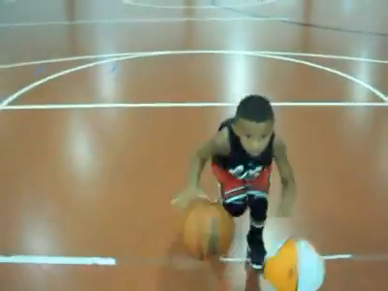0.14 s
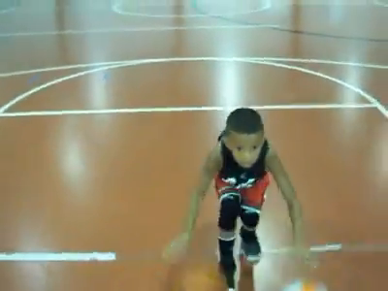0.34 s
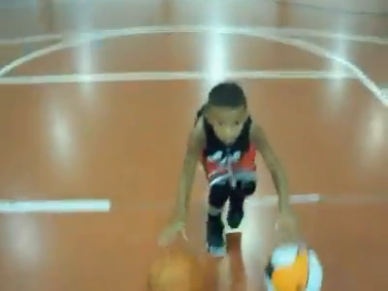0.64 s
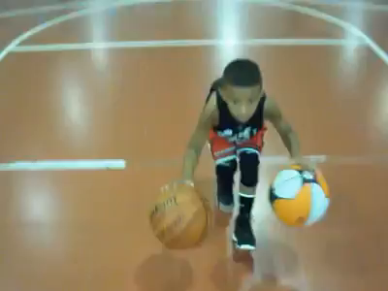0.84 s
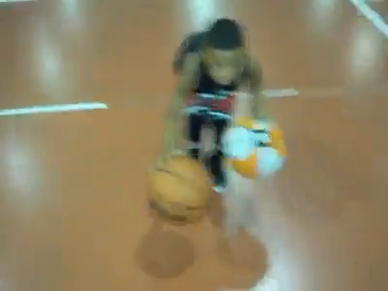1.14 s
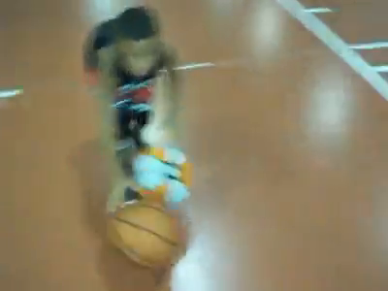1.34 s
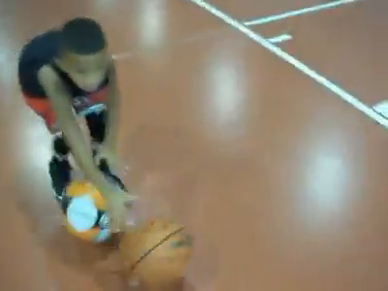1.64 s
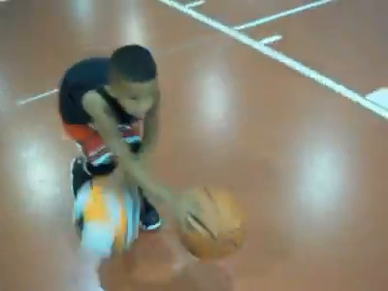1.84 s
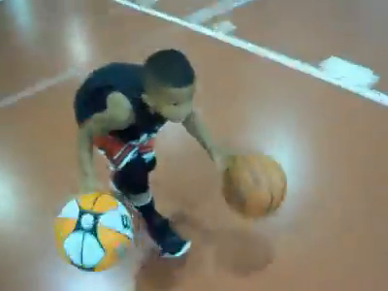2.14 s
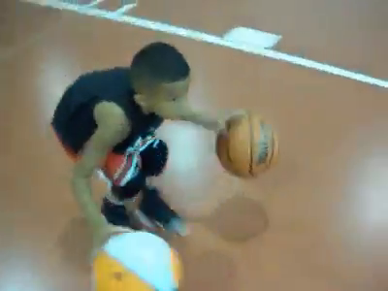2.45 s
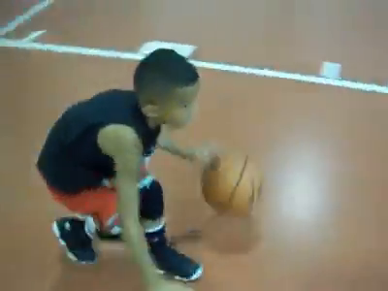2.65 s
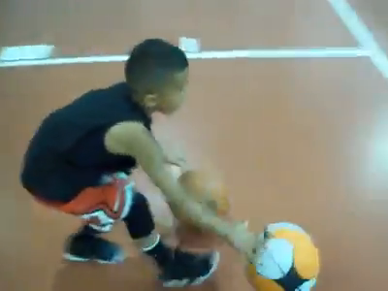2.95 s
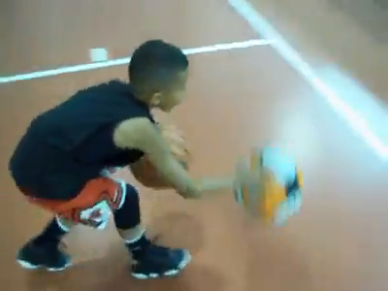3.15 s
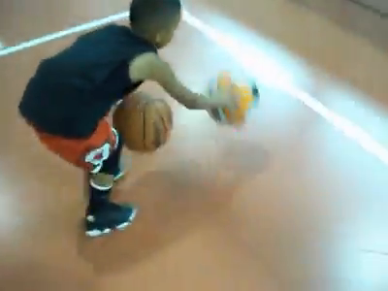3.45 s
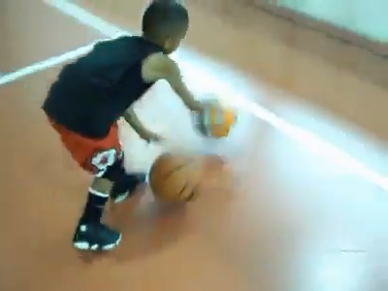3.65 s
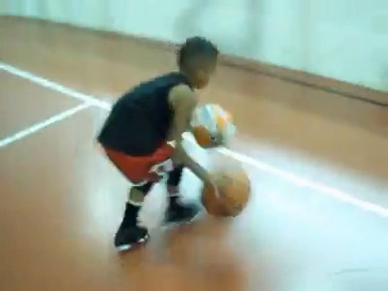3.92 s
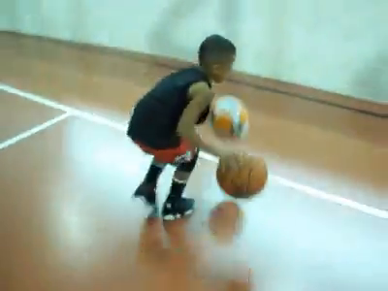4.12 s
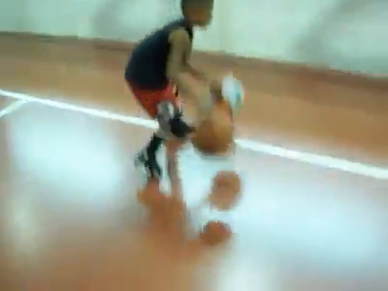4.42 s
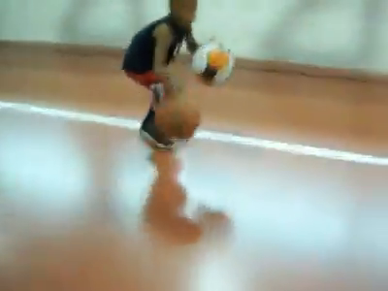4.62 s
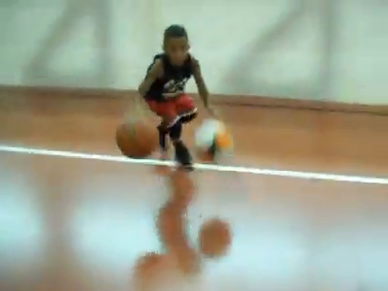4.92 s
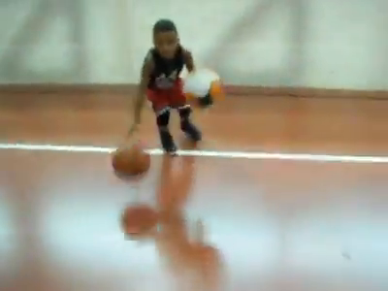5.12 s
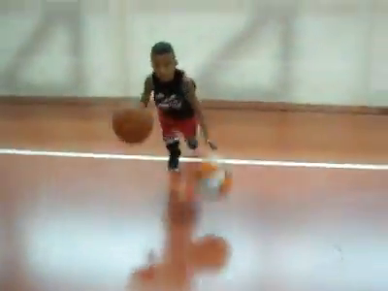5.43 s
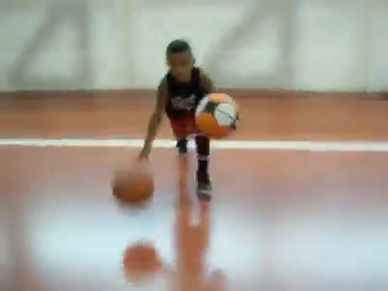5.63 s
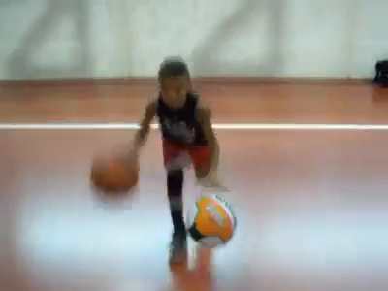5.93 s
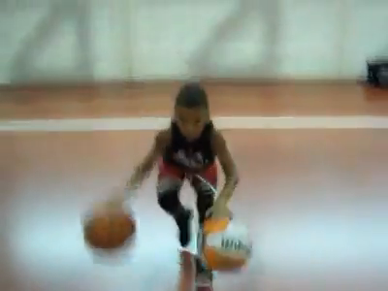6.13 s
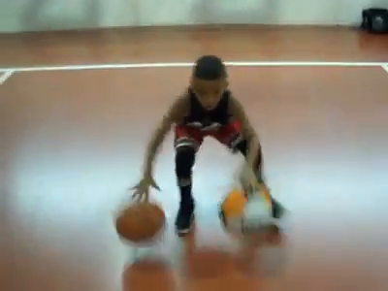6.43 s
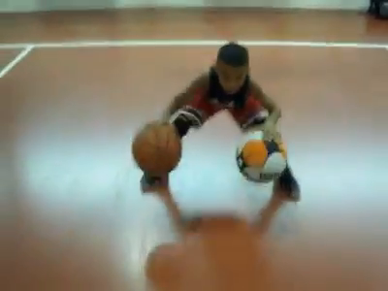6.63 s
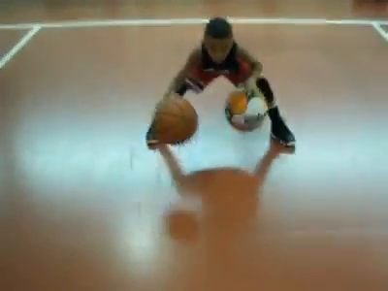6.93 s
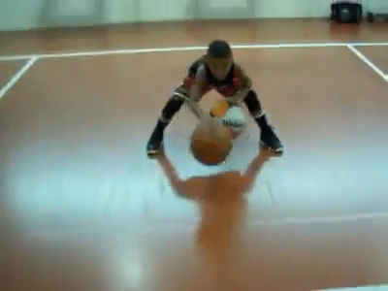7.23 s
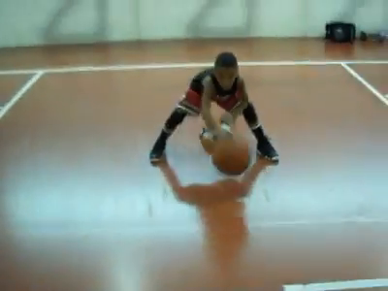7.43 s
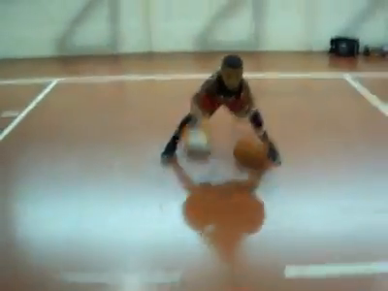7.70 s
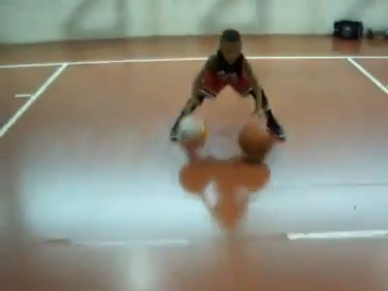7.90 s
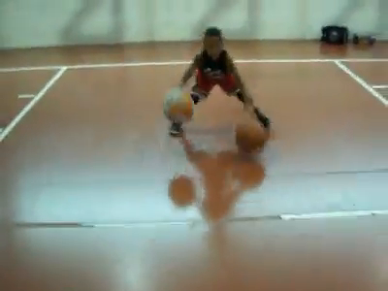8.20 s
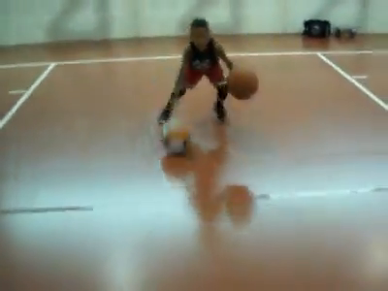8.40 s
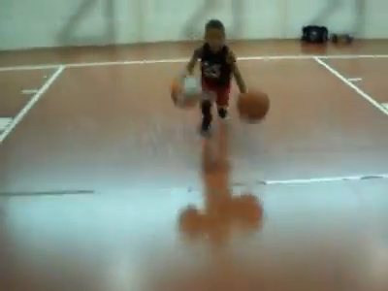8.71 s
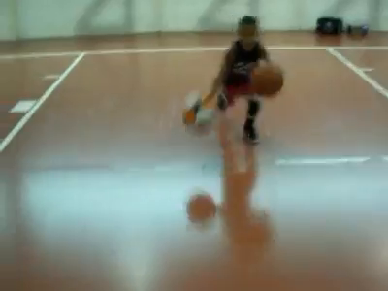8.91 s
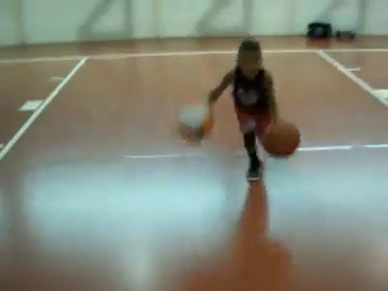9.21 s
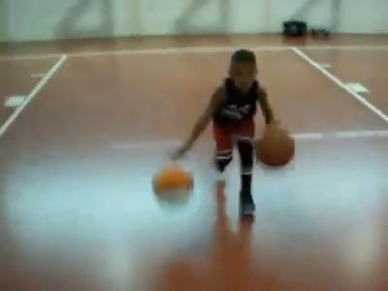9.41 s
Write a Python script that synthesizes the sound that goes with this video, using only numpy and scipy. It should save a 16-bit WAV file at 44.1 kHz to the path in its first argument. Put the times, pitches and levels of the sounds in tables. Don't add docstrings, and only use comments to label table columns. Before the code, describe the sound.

Two balls hit a sprung wooden gym floor about three times a second, nearly in unison, each a low thump with a slappy, ringing edge. Midway the hits separate, alternate and grow louder, soften for a low crossing, then end very loud. Soft steps, hand taps, faint shoe squeaks, far ball booms and ventilation rumble lie behind. A small, dull microphone overloads and ducks after impacts.

```python
import sys
import numpy as np
from scipy import signal
from scipy.io import wavfile

SR = 44100
rng = np.random.default_rng(int(sys.argv[2]) if len(sys.argv) > 2 else 0)


def file_out(sig):
    cols = np.atleast_2d(sig).T
    lim = np.clip(cols, -1, 1)
    pcm = np.round(lim * 32767).astype(np.int16)
    wavfile.write(sys.argv[1], SR, pcm)


def invert_db(level):
    return 10 ** (np.asarray(level, dtype=float) / 20)


N = 421596


def rms_one(x):
    return x / np.sqrt(np.mean(x ** 2) + 1e-20)


def in_time(rows):
    return np.interp(np.arange(N) / SR, *np.transpose(rows))


def bandpass(x, low_hz, high_hz):
    return signal.sosfilt(signal.butter(2, [low_hz, high_hz], "band", fs=SR, output="sos"), x)


def band(noise, low_hz, high_hz):
    return rms_one(bandpass(noise, low_hz, high_hz))


def decay(t, t60_s):
    return invert_db(-60 * t / t60_s)


def ring(t, hz, t60_s):
    return np.sin(2 * np.pi * hz * t) * decay(t, t60_s)


def drift(rate):
    step = 40
    settle = 2000
    r = np.exp(-2 * step * np.pi * rate / SR)
    white = rng.standard_normal(N // step + settle + 2)
    slow = signal.lfilter([1], [1, -2 * r, r * r], white)[settle:]
    return np.interp(np.arange(N) / step, np.arange(len(slow)), rms_one(slow))


def banded_noise(spectrum, patchy_db, rate):
    hz_points, db_points = np.transpose(spectrum)
    octaves = np.log2(hz_points[-1] / hz_points[0])
    edges_hz = np.geomspace(hz_points[0], hz_points[-1], int(3 * octaves) + 2)
    white = rng.standard_normal((2, N + SR))
    together = drift(rate)
    out = 0
    for k, (low_hz, high_hz) in enumerate(zip(edges_hz, edges_hz[1:])):
        noise = bandpass(white[k % 2], low_hz, high_hz)[SR:]
        level_db = np.interp(np.log(low_hz * high_hz) / 2, np.log(hz_points), db_points)
        flicker_db = patchy_db * (0.4 * together + drift(rate))
        out = out + invert_db(level_db + flicker_db) * noise
    return rms_one(out)


# frequency in Hz, density in dB per Hz.
RUMBLE_SPECTRUM = [(7.1, -51.5), (12, 5), (54, 1.5), (110, -10), (140, -21.5), (240, -120)]
# time in seconds, rumble level in dB.
AIRFLOW = [(0.0, -26), (0.48, -35.5), (0.8, -28.5), (3.06, -31), (3.17, -29.5), (3.91, -34), (4.55, -28),
           (5.86, -35), (7.88, -30.5), (8.2, -23), (8.65, -30), (9.56, -27)]


def ventilation():
    return invert_db(in_time(AIRFLOW) + 1.5) * banded_noise(RUMBLE_SPECTRUM, patchy_db=1.5, rate=3.3)


# start in seconds, boom level in dB, wash level in dB.
FAR_BALLS = [
    (.13, -30, -39),
    (1.47, -21, -34),
    (2.5, -26, -37),
    (3.5, -28, -44.5),
    (5.24, -21, -32),
    (5.9, -31.5, -47),
    (6.8, -30, -45),
    (8.2, -35, -36),
]


def far_swells():
    out = np.zeros((2, N))
    for start_s, boom_db, wash_db in FAR_BALLS:
        t = np.maximum(np.arange(N) / SR - start_s, 0)
        rise = 1 - np.exp(-t / 0.042)
        out += invert_db([[boom_db], [wash_db]]) * rise * decay(t, 1.3)
    return out


# frequency in Hz, density in dB per Hz.
BOOM_SPECTRUM = [(35, -18.5), (60, 2.5), (89, -1), (210, -8.5), (291, -25.5), (357, -24), (430, -36.5),
                 (500, -23), (650, -53.5), (1100, -120)]
# frequency in Hz, density in dB per Hz.
WASH_SPECTRUM = [(180, -15.5), (300, -4.5), (429, 4.5), (520, -11.5), (698, -3.5), (1030, -1.5),
                 (1590, -2.5), (1800, 0.5), (2680, -14), (3790, -10), (4710, -22), (5780, -10.5),
                 (6400, -51.5), (8320, -71.5), (14100, -120)]
# time in seconds, wash level in dB.
BUSTLE = [(0.0, -45.5), (1.41, -45.5), (1.57, -40), (2.39, -45), (2.55, -39), (3.35, -45.5), (3.83, -41.5),
          (4.85, -45.5), (5.27, -41), (6.44, -40.5), (7.24, -43), (9.56, -38.5)]


def bustle():
    wash_db = in_time(BUSTLE)
    boom_db = -32.5 + 0.44 * (wash_db - wash_db.mean())
    far_boom, far_wash = far_swells()
    boom = np.hypot(invert_db(boom_db + 2.0), far_boom) * banded_noise(BOOM_SPECTRUM, patchy_db=2.5, rate=16.0)
    wash = np.hypot(invert_db(wash_db + 1.0), far_wash) * banded_noise(WASH_SPECTRUM, patchy_db=1.8, rate=6.0)
    return boom + wash


# start in seconds, end in seconds, centre in Hz, width in Hz, level in dB.
SQUEAKS = [
    (.15, .43, 1880, 150, -44.5),
    (5.32, 5.46, 1940, 200, -45),
    (5.5, 5.68, 2000, 200, -47),
    (6.19, 6.285, 2055, 80, -43),
]


def squeaks():
    t = np.arange(N) / SR
    noise = rng.standard_normal(N)
    out = 0
    for start_s, end_s, hz, width_hz, db in SQUEAKS:
        swell = np.clip(np.minimum(t - start_s, end_s - t) / 0.012, 0, 1)
        out = out + invert_db(db) * swell * band(noise, hz - width_hz / 2, hz + width_hz / 2)
    return out


def hall_tail(x, t60_s, onset_s):
    t = np.arange(2 * SR) / SR
    buildup = 1 - np.exp(-(t / onset_s) ** 2)
    response = rng.standard_normal(len(t)) * decay(t, t60_s) * buildup
    return signal.fftconvolve(x, response / np.sqrt(np.sum(response ** 2)))[:N]


# start in seconds, frequency in Hz, level in dB, t60 in
# seconds.
THUDS = [(0.292, 385, -13, 0.04), (1.402, 205, -16.5, 0.12), (2.235, 366, -33, 0.12),
         (2.426, 249, -24, 0.16), (3.794, 182, -3.5, 0.054), (5.707, 188, -7, 0.029),
         (6.375, 412, -19, 0.057), (6.374, 199, -10.5, 0.034), (6.46, 252, -21.5, 0.043),
         (6.741, 272, -13.5, 0.027), (6.87, 189, -20.5, 0.094), (7.313, 250, -18, 0.049)]


def floor_thuds():
    size = SR // 10
    t = np.arange(size) / SR
    out = np.zeros(N + 2 * size)
    for start_s, hz, db, t60_s in THUDS:
        at = round(start_s * SR)
        out[at:at + size] += invert_db(db) * ring(t, hz, t60_s) * (1 - np.exp(-t / 0.0003))
    return out[:N]


# frequency in Hz, level against the stronger of push and shell in dB, t60 in
# seconds.
BALL_MODES = [(425.8, -11.5, 0.082), (320.8, -18.5, 0.019), (457.4, -26.5, 0.097), (996, -22, 0.12),
              (1290, -21, 0.07)]


def bounce(slap_db, slap_hz, push_db, shell_db, tick_db, rough, spot_db, chance, noise):
    t = np.arange(len(noise)) / SR
    contact_s, push_hz, shell_hz = 0.011, 96, 197
    on_floor = np.sin(np.pi / 2 * np.clip(t / 0.0009, 0, 1)) ** 2 / (1 + (t / contact_s) ** 6)
    push = on_floor * np.cos(2 * np.pi * push_hz * t + 0.27)
    shell = (on_floor + 0.04) * ring(t, shell_hz, 0.2)

    modes = 0
    for (hz, db, t60_s), c in zip(BALL_MODES, chance):
        modes = modes + invert_db(db + 0.53 * np.tanh(c)) * ring(t, hz * (1 + 0.025 * c), t60_s)
    modes = modes * (1 - np.exp(-t / 0.0089))
    boards = invert_db(-8.5) * band(noise[::-1], 220, 340) * (1 - np.exp(-t / 0.012)) * decay(t, 0.066)

    rise = np.clip(t / (0.0001 + 0.002 * rough ** 2), 0, 1)
    smack = rise * np.exp(-(t / (0.002 + 0.003 * rough)) ** 2)
    tone = np.sin(2 * np.pi * slap_hz * t)
    rasp = band(noise, 0.67 * slap_hz, 1.28 * slap_hz)
    slap = smack * ((1 - rough) * tone + 1.07 * rough * rasp)
    slap = slap + 0.17 * band(noise, 750, 1800) * (1 - np.exp(-t / 0.001)) * decay(t, 0.075)
    tick = band(noise[::-1], 1500, 4810) * (smack + 0.059 * decay(t, 0.35))

    low = invert_db(push_db) * push + invert_db(shell_db) * shell
    low = low + invert_db(max(push_db, shell_db) + spot_db) * (modes + boards)
    return invert_db(2.0) * low + invert_db(slap_db + 1.5) * slap + invert_db(tick_db - 0.5) * tick


# start in seconds, slap level in dB, slap frequency in Hz, push level in dB, shell level in dB.
PAIRED = [(0.0574, -11.5, 1430, -10, -13), (0.1121, -12, 1890, -11.5, -20),
          (0.4277, -10.5, 1380, -17, -13.5), (0.4375, -15, 1930, -13.5, -12),
          (0.7277, -8.5, 1450, -16.5, -9), (0.7549, -15, 1650, -8, -11.5),
          (1.0631, -16, 1790, -18.5, -11.5), (1.0819, -9.5, 1700, -17.5, -14),
          (1.3975, -12, 1890, -28, -10), (1.4015, -16.5, 1710, -41, -20.5),
          (1.7144, -10.5, 1900, -12.5, -13), (1.7264, -13.5, 1281, -14.5, -27),
          (2.022, -12.5, 2100, -11, -16.5), (2.051, -20, 2030, -19, -39),
          (2.3629, -11.5, 1290, -10.5, -11.5), (2.3901, -10, 2220, -17, -10),
          (2.6972, -14.5, 1260, -13.5, -32), (2.7369, -9.5, 1080, -9.5, -14),
          (3.052, -12.5, 1280, -10, -15), (3.1008, -8, 2200, -6, -31.5), (3.4034, -13.5, 1410, -42, -15),
          (3.4556, -10.5, 1340, -11, -16.5), (3.7402, -11, 1440, -13, -19), (3.7905, -11.5, 920, -8, -29.5)]
# start in seconds, slap level in dB, slap frequency in Hz, push level in dB, shell level in dB.
ALTERNATE = [(4.088, -14, 1116, -10, -33), (4.0951, -13.5, 1210, -37, -30), (4.106, -15, 1027, -12, -42),
             (4.112, -7, 840, -9.5, -12.5), (4.4312, -11.5, 895, -12, -34), (4.4426, -26.5, 966, -16, -31),
             (4.8307, -8.5, 1230, -13, -13.5), (4.9454, -5.5, 1440, -8, -10.5),
             (5.193, -8.5, 1310, -6, -12), (5.481, -5, 1630, -4.5, -5), (5.6895, -7.5, 1460, -7, -8),
             (5.9622, -7, 1660, -3.5, -10), (6.1427, -4.5, 1090, -4.5, -10), (6.3025, -4.5, 1880, -6, -3),
             (6.557, -14, 1760, -10, -10), (6.588, -6.5, 1490, -8.5, -12), (6.8568, -8.5, 1280, -12, -15.5),
             (7.1442, -17.5, 1350, -16.5, -29), (7.1602, -11.5, 1460, -23, -11.5),
            (7.4463, -8.5, 950, -11, -17), (7.7288, -15, 940, -13.5, -13),
            (7.9781, -12.5, 1800, -15.5, -11.5), (7.9994, -16.5, 1380, -24, -11.5),
            (8.2027, -13, 1310, -17.5, -10.5), (8.2967, -7.5, 1076, -11, -11), (8.5152, -2, 1280, -4.5, -6),
            (8.696, -5.5, 1120, -9.5, -10), (8.9374, -4, 1734, -6.5, -3), (9.1945, -6.5, 1160, -3.5, -6.5),
            (9.4548, 0, 1173, -4.5, -1.5)]
# delay in seconds, slap against the bounce in dB, slap
# frequency in Hz, tick against that slap in dB.
AFTERSLAP = [
    (0.0108, -16, 1130, -20),
]
# start in seconds, slap level in dB, slap frequency in Hz, tick level in dB.
TAPS = [(1.462, -19.5, 1290, -34), (1.471, -29.5, 1290, -37.5), (1.488, -24, 1300, -30),
        (1.566, -23, 1330, -35), (2.2358, -26.5, 807, -35.5), (2.5265, -19, 1580, -46.5),
        (2.5773, -24, 1300, -37), (2.423, -27.5, 1200, -39), (3.074, -29, 1660, -46),
        (4.126, -24, 1055, -43), (4.4496, -17.5, 1120, -21), (5.2342, -24, 1570, -41),
        (4.729, -40, 1520, -42), (5.8848, -44, 1800, -34), (6.009, -27.5, 1210, -33),
        (6.374, -22.5, 1580, -22.5), (6.463, -28.5, 1344, -34.5), (6.7395, -24.5, 1040, -27.5),
        (7.315, -24, 1500, -52.5), (7.7406, -23, 1120, -31.5), (7.8953, -22, 1150, -44),
        (8.085, -33.5, 1500, -38.5), (8.1886, -27, 1910, -31), (8.9485, -10.5, 980, -44),
        (8.99, -23, 1540, -33), (9.5073, -20, 1650, -45)]


def contact_list():
    rough, no_weight_db = 0.7, -40
    hits = PAIRED + ALTERNATE
    tick_under_db = [-17, -13.5] * (len(PAIRED) // 2) + [-12.5] * (len(hits) - len(PAIRED))
    luck = np.tanh(rng.standard_normal((len(hits), 1 + len(AFTERSLAP), 3)))
    rows = []
    for hit, under_db, c in zip(hits, tick_under_db, luck):
        start_s, slap_db = hit[:2]
        rows.append((*hit, slap_db + under_db + 6.5 * c[0, 0], 0.2))
        for (delay_s, db, hz, tick_db), (late, loud, high) in zip(AFTERSLAP, c[1:]):
            after_s = start_s + delay_s + 0.001 * late
            after_db = slap_db + db + 3 * loud
            after_hz = hz + 120 * high
            rows.append((after_s, after_db, after_hz, no_weight_db, no_weight_db, after_db + tick_db, rough))
    for start_s, slap_db, slap_hz, tick_db in TAPS:
        rows.append((start_s, slap_db, slap_hz, no_weight_db, no_weight_db, tick_db, rough))
    return rows


# time in seconds, ringing level in dB.
SPOT = [(0, 3), (2.5, 10), (4.6, 2), (5.0, 2), (7.0, 2), (9.56, -4.5)]
# time in seconds, extra path in metres, echo level in dB.
WALL = [(0, 4.8, -12.5), (2.0, 3.76, -21.5), (2.7, 4.0, -13), (3.4, 3.39, -15), (4.4, 3.37, -11.5),
        (4.95, 3.27, -12), (5.7, 4.13, -13), (5.961, 5.4, -8), (6.3, 7.66, -13), (6.859, 8.2, -10.5),
        (8.3, 8.4, -14.5), (8.698, 10, -14.5), (9.2, 11, -16.5), (9.46, 14.3, -14.5)]


def dribbling():
    size, sound_m_per_s = SR // 10, 343
    contacts = contact_list()
    chance = rng.standard_normal((len(contacts), len(BALL_MODES)))
    noise = rng.standard_normal((len(contacts), size))
    wall_s, path_m, wall_db = np.transpose(WALL)
    out = np.zeros(N + 2 * size)
    for (start_s, *levels), c, n in zip(contacts, chance, noise):
        spot_db = np.interp(start_s, *np.transpose(SPOT))
        sound = bounce(*levels, spot_db, c, n)
        at = round((start_s - 0.0003) * SR)
        out[at:at + size] += sound
        at += round(np.interp(start_s, wall_s, path_m) / sound_m_per_s * SR)
        out[at:at + size] += invert_db(np.interp(start_s, wall_s, wall_db)) * sound
    return out[:N]


def scene():
    background = ventilation() + bustle() + squeaks()
    near = dribbling() + floor_thuds()
    slaps = bandpass(near, 650, 3000)
    hall = invert_db(-17.5) * hall_tail(slaps, t60_s=1.1, onset_s=0.043)
    return (background + near + hall)[None]


def gain_control(x, knee_db, slope, release_db_per_s, attack_s):
    fall_db = release_db_per_s * np.arange(N) / SR
    held_db = np.maximum.accumulate(20 * np.log10(np.abs(x) + 1e-9) + fall_db, axis=-1) - fall_db
    r = np.exp(-1 / (attack_s * SR))
    cut_db = signal.lfilter([1 - r], [1, -r], slope * np.maximum(held_db - knee_db, 0))
    return x * invert_db(-cut_db)


GAPS = [.085, .415, .708, 1.105, 1.425, 1.745, 2.004, 2.375, 2.765, 3.021, 3.085, 3.135, 3.436, 3.718,
        4.412, 4.475, 4.862, 4.934, 5.225, 5.511, 5.67, 5.943, 6.281, 7.426, 7.95, 8.177, 8.53, 8.92, 9.221,
        9.437]
# low edge in Hz, high edge in Hz, chance of loss 0-1.
GAP_BANDS = [(2700, 3200, .25), (3200, 3900, .3), (3900, 4600, .6), (4600, 5400, .9), (5400, 9000, 1)]


def treble_gaps(x):
    shortest_s, spread_s = 0.016, 0.018
    luck = rng.random((len(GAPS), len(GAP_BANDS), 3))
    for k, (low_hz, high_hz, chance) in enumerate(GAP_BANDS):
        gap = np.zeros(N)
        for middle_s, (lost, late, longer) in zip(GAPS, luck[:, k]):
            size = round((shortest_s * np.sqrt(chance) + spread_s * longer) * SR)
            at = round((middle_s + spread_s * (late - 0.5)) * SR) - size // 2
            gap[at:at + size] = (lost < chance) * signal.windows.tukey(size, 0.3)
        edges_hz = [0.97 * low_hz, 1.03 * high_hz]
        steep = signal.ellip(4, 0.05, 30, edges_hz, "band", fs=SR, output="sos")
        x = x - gap * signal.sosfiltfilt(steep, x)
    return x


def top_cut(x):
    return signal.sosfilt(signal.butter(12, 12500, fs=SR, output="sos"), x)


def record(dry):
    x = signal.sosfilt(signal.cheby2(8, 50, 7560, fs=SR, output="sos"), dry)
    x = gain_control(x, knee_db=-11.0, slope=0.44, release_db_per_s=144, attack_s=0.013)
    x = x / (1 + np.abs(x / 0.66) ** 24) ** (1 / 24)
    x = treble_gaps(x)
    body = signal.sosfiltfilt(signal.butter(4, 6300, fs=SR, output="sos"), x)
    x = body + invert_db(-10) * (x - body)
    x = signal.sosfilt(signal.cheby2(8, 45, 12300, fs=SR, output="sos"), x)
    x = x * np.clip((N - np.arange(N)) / (0.004 * SR), 0, 1)
    return top_cut(x)


dry = scene()
out = record(dry)
file_out(out)
```